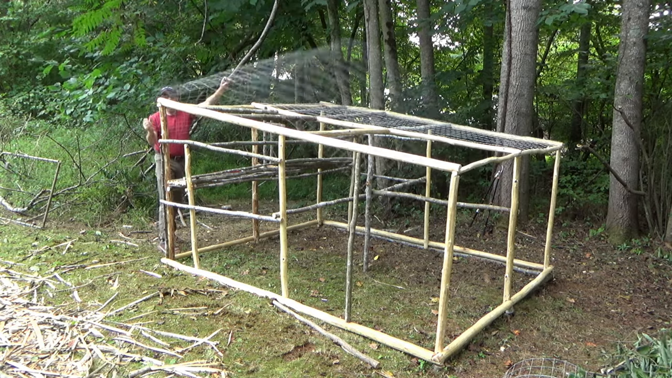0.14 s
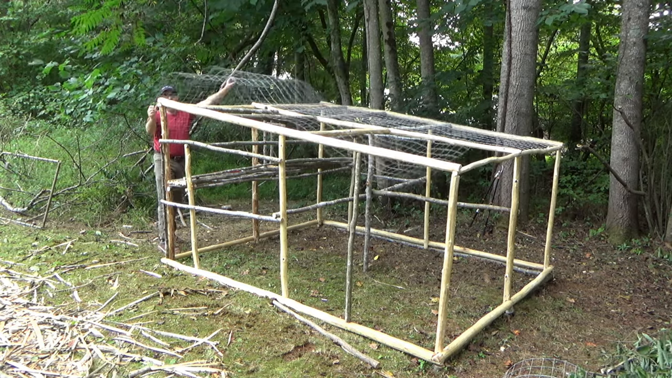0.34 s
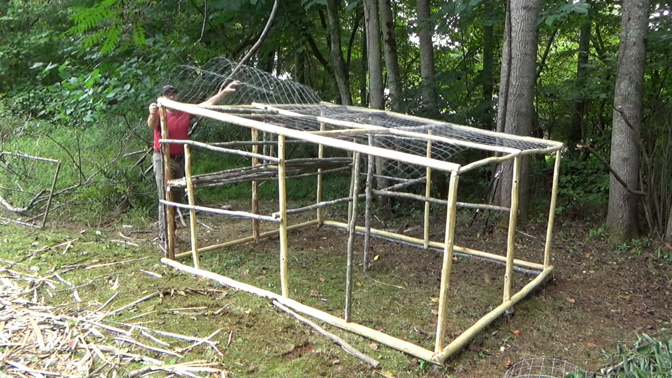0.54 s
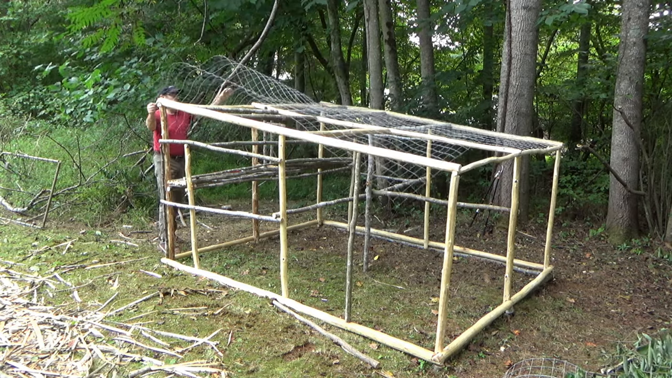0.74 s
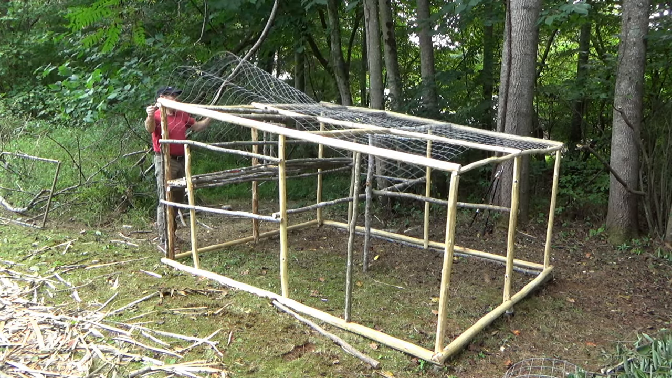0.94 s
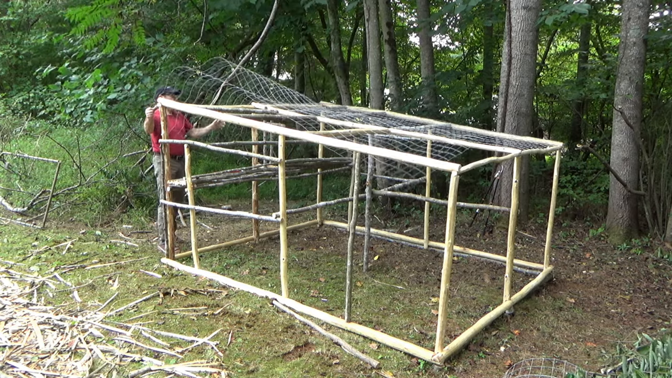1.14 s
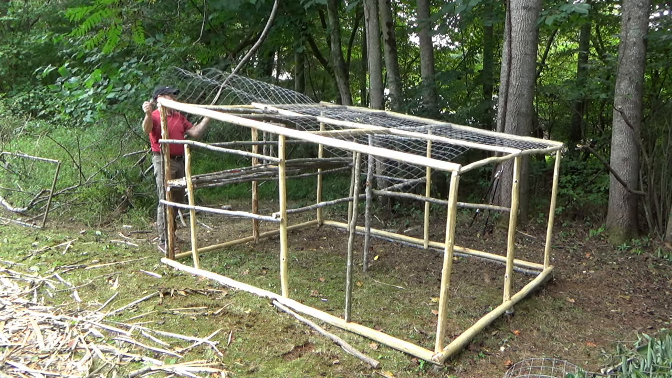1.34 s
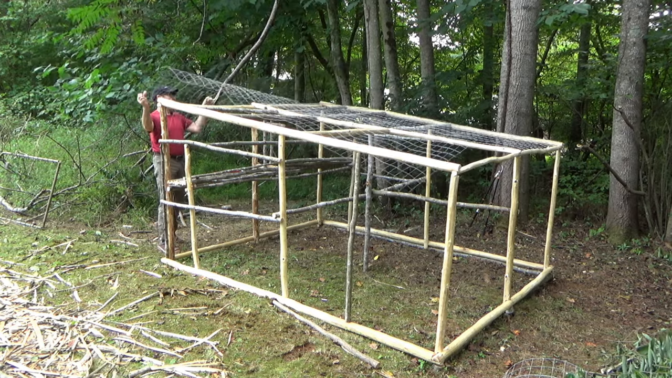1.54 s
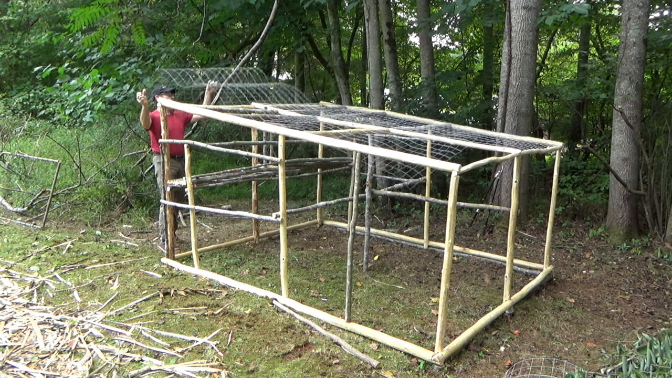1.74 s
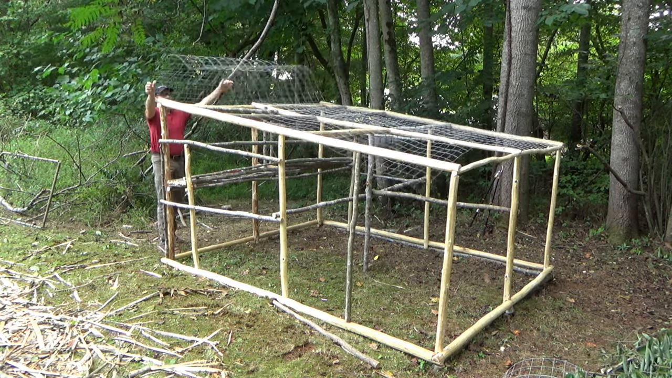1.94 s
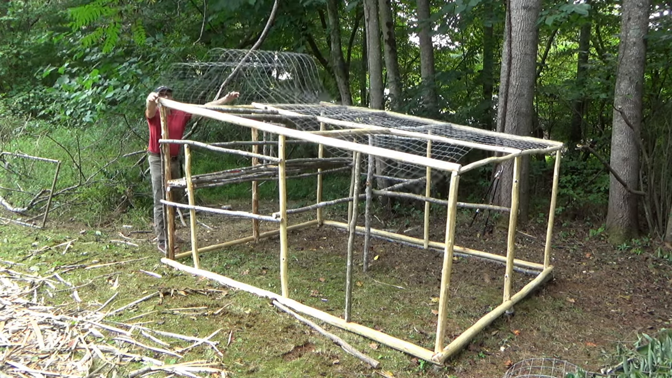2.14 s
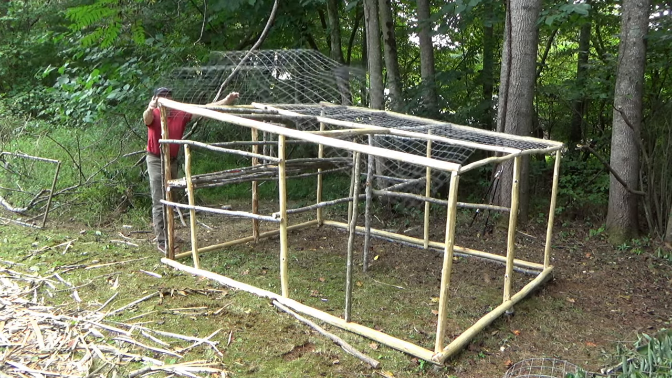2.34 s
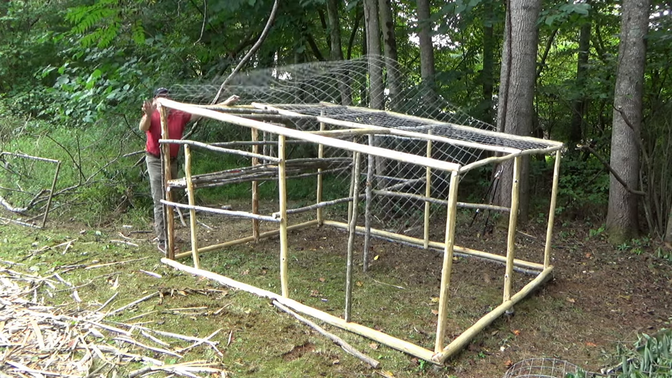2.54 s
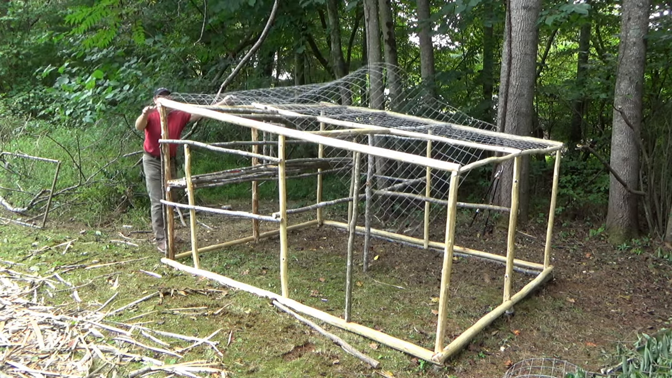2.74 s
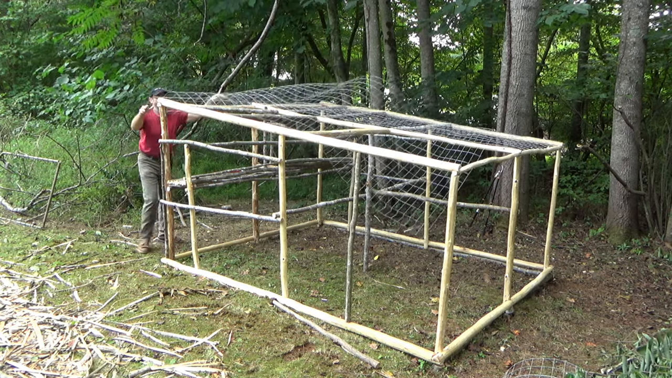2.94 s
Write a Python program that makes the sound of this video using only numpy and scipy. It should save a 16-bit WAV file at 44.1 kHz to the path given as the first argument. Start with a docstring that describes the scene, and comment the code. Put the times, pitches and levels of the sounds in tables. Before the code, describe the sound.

A sheet of wire mesh rattles against wooden poles in bright, irregular bursts, strongest early and softer afterwards, echoing slightly among trees. Behind it are faint insects and leaves, and air taps the microphone near the end.

```python
"""In summer woods, a sheet of springy wire mesh is flipped over a pole frame some metres away.
Wires hit wires and poles in bursts of clatter and shiver on in between; now and then one wire pings.
Each tiny hit rings briefly, and thousands of them blend into a rattle that echoes off the tree trunks.
Behind it, leaves hiss, insects buzz in the trees and puffs of air tap the microphone."""
import sys
import numpy as np
from scipy import signal
from scipy.fft import rfft, irfft
from scipy.io import wavfile

SR = 44100
rng = np.random.default_rng(int(sys.argv[2]) if len(sys.argv) > 2 else 0)


def store_pcm(level_fs):
    """Save levels as 16-bit WAV."""
    pcm = np.round(np.clip(level_fs, -1, 1) * 32767).astype(np.int16)
    wavfile.write(sys.argv[1], SR, np.atleast_2d(pcm).T)


N = 134505

# Sudden shakes of the mesh: (time [s], treble level [dB], body level [dB], length [s])
MESH_JOLTS = [(0.0044, -66, -41.5, 0.01), (0.217, -31, -33.5, 0.023), (0.239, -23.5, -32, 0.022),
              (0.274, -51, -31, 0.035), (0.311, -27.5, -36, 0.01), (0.38, -24.5, -31, 0.024),
              (0.404, -32, -30, 0.019), (0.437, -22.5, -36, 0.027), (0.465, -33, -28.5, 0.035),
              (0.567, -48, -33, 0.022), (0.705, -27.5, -27, 0.028), (0.771, -37, -29.5, 0.019),
              (0.942, -48, -38.5, 0.051), (1.015, -40.5, -39, 0.035), (1.093, -37.5, -38, 0.031),
              (1.15, -37.5, -41, 0.037), (1.404, -41, -60, 0.015), (1.605, -37, -41.5, 0.032),
              (1.702, -45, -45, 0.034), (1.81, -37, -47, 0.045), (1.922, -38, -46, 0.045),
              (2.016, -35, -52, 0.01), (2.045, -36, -39.5, 0.031), (2.092, -42, -41.5, 0.02),
              (2.166, -45, -41.5, 0.02), (2.256, -37.5, -40, 0.03), (2.337, -40.5, -37.5, 0.035),
              (2.383, -36.5, -38, 0.03), (2.408, -30.5, -32.5, 0.023), (2.5944, -44, -51, 0.01),
              (2.638, -70, -37, 0.008), (2.681, -41, -41.5, 0.026), (2.721, -43, -40.5, 0.046),
              (2.804, -45, -40, 0.013), (3.04, -41, -57, 0.03)]
# Shivering of the mesh between jolts: (time [s], body level [dB], treble level [dB])
MESH_SHIVER = [(.2, -58, -77), (.26, -28, -44), (.54, -27, -32.5), (.9, -31.5, -39.5), (1.202, -39, -48),
               (1.6, -43.5, -43.5), (1.9, -43, -45.5), (2.3, -41, -48), (2.5, -35.5, -75),
               (2.7, -42.5, -54), (3.05, -41.5, -46.5)]
# Tone colour of the wire: (frequency [Hz], gain [dB])
WIRE_COLOUR = [(60, -62), (130, -25), (282, -20.5), (330, -13.5), (870, -1), (1670, 0.5), (2770, -0.5),
               (3500, -5.5), (5100, -6.5), (5600, -6.5), (7000, -6), (8800, -7.5), (9700, -11.5),
               (10500, -6), (11200, -11.5), (12500, -18), (13800, -16), (15700, -22)]
# Notes the wires ring at: (pitch [Hz], width [Hz], relative level [dB])
WIRE_RESONANCES = [(876, 150, -4.5), (1461, 170, -0.5), (1700, 220, 0), (2252, 116, 0), (2715, 67, -2),
                   (3186, 98, -4.5), (4087, 130, -4)]
# Single wires that stand out of the clatter: (time [s], level [dB], pitch [Hz], length [s])
WIRE_PINGS = [(0.038, -41, 2080, .02), (0.221, -26.5, 5600, 0.012), (0.241, -25.5, 3230, 0.022),
              (.262, -27.5, 2600, 0.021), (0.243, -25, 5650, 0.016), (0.235, -30.5, 9040, 0.031),
              (0.262, -25, 2310, 0.0098), (0.374, -32, 6200, 0.031),  (0.314, -21.5, 5480, 0.0072),
              (0.452, -29, 3000, 0.026), (0.713, -25, 4400, 0.011), (0.717, -28, 1680, 0.017),
              (1.596, -41, 1380, 0.037), (2.35, -38.5, 1290, 0.026), (2.402, -35.5, 1340, 0.02),
              (2.5, -37, 3600, .005), (2.414, -34, 5600, .01), (2.388, -35, 3050, .015),
              (2.645, -33.5, 780, .008), (2.646, -37, 1400, .008), (2.409, -36, 2540, 0.014)]
# Tone colour of far leaves and air: (frequency [Hz], gain [dB])
LEAF_COLOUR = [(18, -54), (30, -34), (174, -25.5), (381, -9.5), (644, -8), (1000, -3.5), (1700, -6),
               (3270, -14.5), (4470, -3), (5100, -9), (5970, 3.5), (9320, -21), (15700, -57)]
# Buzzing insects: (pitch [Hz], width [Hz], level [dB])
INSECT_BANDS = [(6610, 170, -54), (7670, 2200, -48.5)]
# Single pushes of air: (time [s], strength [dB], pitch [Hz])
AIR_PUFFS = [(2.059, -43, 189), (3.005, -34.5, 185)]
# Low rumble of moving air: (time [s], level [dB])
BREEZE_LEVELS = [(0, -70), (.4, -65), (.9, -67.5), (1.2, -78.5), (1.9, -73), (2.05, -67), (2.2, -75),
                 (2.7, -76), (2.79, -62), (2.875, -59), (3.05, -68)]
# Lean between the two sides: (frequency [Hz], left minus right [dB])
STEREO_BALANCE = [(60, 0), (1600, 0), (2200, -2.2), (4400, -2.4), (8000, -1.2), (11000, 0)]
# Scattered sound that differs between the sides: (frequency [Hz], gain [dB])
STEREO_SPREAD = [(60, -22), (200, -9.5), (700, -8), (1100, -21), (1800, -29), (2300, -10), (4000, -8),
                 (7000, -6.5), (10000, 0.5), (12200, -20)]

TOUCHES_PER_S, TOUCH_RING_S = 14000, 0.00093
SPLIT_HZ = 5800  # "body" is the sound below this, "treble" the sound above
# A T60 is the time a sound takes to fade by 60 dB, in seconds.
TREBLE_T60, BODY_T60, LINGER_T60, PING_T60, ECHO_T60 = 0.16, 0.21, 0.81, 0.057, 0.44
NOTES_DB, LINGER_DB, ECHO_DB, LEAVES_DB, SCATTER_DB = -7, -9.5, -7.5, -38.5, -10.5


def mesh_clatter(rings, clicks):
    """Jolts make the wires rattle; the treble dies fast, the body lingers and the mesh shivers on."""
    notes = sum(amp(db) * ringing_band(clicks, hz, max(width, 120), 600)
                for hz, width, db in WIRE_RESONANCES)
    wire = unit_level(shaped(rings, WIRE_COLOUR)) + amp(NOTES_DB) * unit_level(notes)
    body = unit_level(filtered(wire, lambda f: 1 / np.sqrt(1 + (f / SPLIT_HZ) ** 4)))
    treble = unit_level(filtered(wire, lambda f: 1 / np.sqrt(1 + (SPLIT_HZ / (f + 1)) ** 4)))
    t = np.arange(N) / SR
    times, body_shiver_db, treble_shiver_db = np.transpose(MESH_SHIVER)
    body_power = amp(np.interp(t, times, body_shiver_db)) ** 2
    treble_power = amp(np.interp(t, times, treble_shiver_db)) ** 2
    for start, treble_db, body_db, length in MESH_JOLTS:
        linger = amp(LINGER_DB) * burst(start, length, LINGER_T60)
        body_power += (amp(body_db) * (burst(start, length, BODY_T60) + linger)) ** 2
        treble_power += (amp(treble_db) * burst(start, length, TREBLE_T60)) ** 2
    flicker = amp(1.2 * wander(37))
    return body * np.sqrt(body_power) + treble * np.sqrt(treble_power) * flicker


def wire_touches(wire_count=96):
    """Wires touch at random, each ringing at its own pitch. Gives hissy ringing and the bare clicks."""
    strength = amp(1.5 * np.minimum(rng.exponential(1, N), 4))
    hits = strength * (rng.random(N) < TOUCHES_PER_S / SR)
    which_wire = rng.integers(0, wire_count, N)
    stretch = np.exp(.5 * rng.standard_normal(wire_count))  # some wires ring longer
    pitches = np.linspace(150, 16500, wire_count) + rng.uniform(-100, 100, wire_count)
    t, rings = np.arange(2000) / SR, np.zeros(N)
    for k, hz in enumerate(pitches):
        fade = np.exp(-t / (TOUCH_RING_S * stretch[k])) / np.sqrt(stretch[k])
        rings += signal.oaconvolve(hits * (which_wire == k), np.sin(2 * np.pi * hz * t) * fade)[:N]
    hiss = .5 * rng.standard_normal(N)
    clicks = unit_level(hits * rng.choice([-1, 1], N))
    return unit_level(rings) + hiss, clicks


def wire_ping(clicks, start, db, hz, length, tone_share=.35):
    """One wire rings out: partly a clear tone, partly its rattle."""
    rattle = ringing_band(clicks, hz, 310, 620)
    tone = np.sqrt(2) * np.sin(2 * np.pi * (hz * np.arange(N) / SR + rng.random()))
    blend = tone_share * tone + np.sqrt(1 - tone_share ** 2) * rattle
    return amp(db) * burst(start, length, PING_T60) * blend


def trunk_echoes(clatter):
    """Tree trunks throw the clatter back, a little later and duller."""
    t = np.arange(SR // 2) / SR
    tail = rng.standard_normal(len(t)) * amp(-60 * t / ECHO_T60) * (t > .012)
    echo = signal.fftconvolve(clatter, tail / np.linalg.norm(tail))[:N]
    return amp(ECHO_DB) * filtered(echo, lambda f: 1 / np.sqrt(1 + (f / 9000) ** 2))


def leaves():
    """Far leaves and air make a soft hiss that wavers a little."""
    return amp(LEAVES_DB + wander(16)) * unit_level(shaped(rng.standard_normal(N), LEAF_COLOUR))


def insects():
    """Insects buzz in the trees: high bands of noise that throb and flutter."""
    buzz = np.zeros(N)
    for hz, width, db in INSECT_BANDS:
        throb = amp(db + 1.8 * wander(9) + 0.88 * wander(90))
        buzz += throb * ringing_band(rng.standard_normal(N), hz, width, width)
    return buzz


def air_on_microphone():
    """Air pushes on the microphone: a lumpy rumble and single taps, stronger on the left."""
    t = np.arange(N) / SR
    rumble = unit_level(filtered(rng.standard_normal(N), lambda f: f ** 2 / (1 + (f / 130) ** 5)))
    air = rumble * amp(np.interp(t, *np.transpose(BREEZE_LEVELS)) + 2.2 * wander(14))
    for start, db, hz in AIR_PUFFS:
        cycles = (t - start - .005) * hz
        air += amp(db) * np.sin(2 * np.pi * cycles) * np.exp(-(cycles / 0.41) ** 2)
    return air * np.array([[1.08], [.92]])


def stereo(direct, scattered):
    """Left and right hear nearly the same direct sound, but differ in the scattered sound."""
    spectrum = signal.stft(scattered, SR, nperseg=256)[2]
    random_phase = np.exp(2j * np.pi * rng.random(spectrum.shape))
    blurred = signal.istft(spectrum * random_phase, SR, nperseg=256)[1][:N]
    apart = shaped(blurred, STEREO_SPREAD)
    return np.array([shaped(direct, STEREO_BALANCE, side / 2) + side * apart for side in (1, -1)])


def amp(db):
    """Turns decibels into a number to multiply by."""
    return 10 ** (np.asarray(db) / 20)


def unit_level(x):
    """Scales a sound to an average (rms) level of 1."""
    return x / np.sqrt(np.mean(x ** 2) + 1e-20)


def filtered(x, gain):
    """Turns each frequency up or down by gain(frequency)."""
    return irfft(rfft(x) * gain(np.fft.rfftfreq(N, 1 / SR)), N)


def shaped(x, curve, amount=1):
    """Filters by a table of (frequency [Hz], gain [dB]); amount scales the decibels."""
    hz, db = np.transpose(curve)
    return filtered(x, lambda f: amp(amount * np.interp(np.log(f + 1), np.log(hz + 1), db)))


def ringing_band(x, hz, *widths_hz):
    """Keeps the sound near one pitch, filtering once for each width; the result has level 1."""
    turn = np.exp(2j * np.pi * hz * np.arange(N) / SR)
    for width in widths_hz:
        decay = np.exp(-np.pi * width / SR)
        x = 2 * (turn * signal.lfilter([1 - decay], [1, -decay], x / turn)).real
    return unit_level(x)


def wander(rate_hz):
    """A smooth random drift of level 1; a higher rate drifts faster."""
    return unit_level(filtered(rng.standard_normal(N), lambda f: np.exp(-(f / rate_hz) ** 2) * (f > 0)))


def burst(start, length, t60, rise_s=0.0064):
    """A loudness shape that rises quickly, holds, then fades."""
    t = np.arange(N) / SR - start
    return np.clip(t / rise_s, 0, 1) * amp(-60 * np.maximum(t - length, 0) / t60)


def scene():
    """Mixes the mesh and its echoes with the woods and the moving air."""
    rings, clicks = wire_touches()
    pings = sum(wire_ping(clicks, *row) for row in WIRE_PINGS)
    clatter = mesh_clatter(rings, clicks)
    woods = leaves() + insects()
    mesh = clatter + pings + trunk_echoes(clatter)
    return stereo(mesh + woods, amp(SCATTER_DB) * mesh + woods) + air_on_microphone()


def record(dry, cutoff_hz=15740):
    """Cuts away the very highest treble."""
    low_pass = signal.firwin(1501, cutoff_hz, window=("kaiser", 10), fs=SR)
    return signal.oaconvolve(dry, low_pass[None], "same")


dry = scene()
out = record(dry)
store_pcm(out)
```